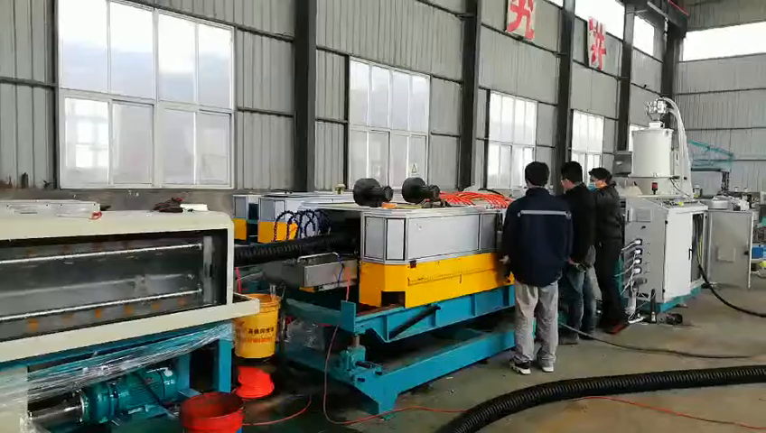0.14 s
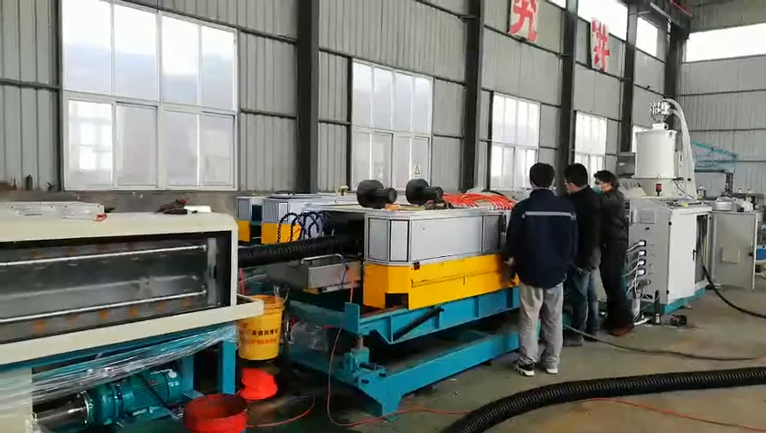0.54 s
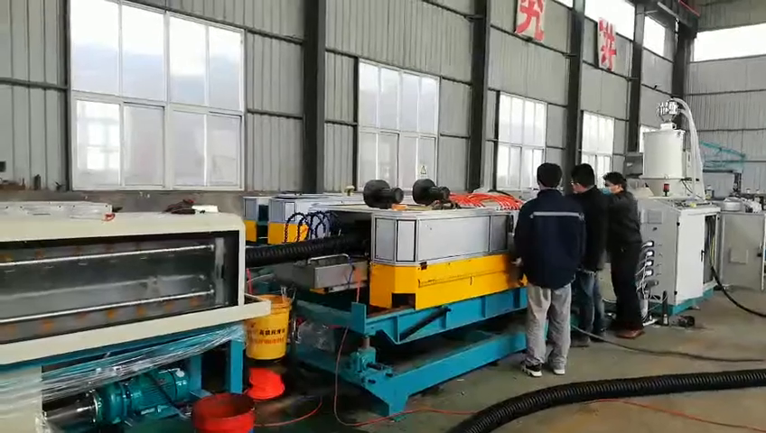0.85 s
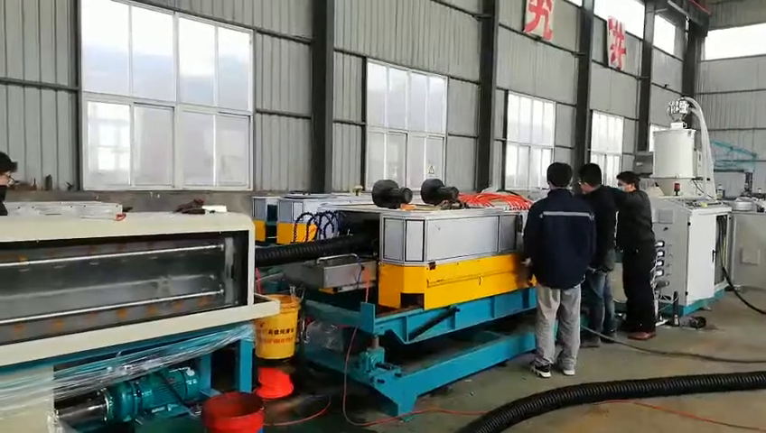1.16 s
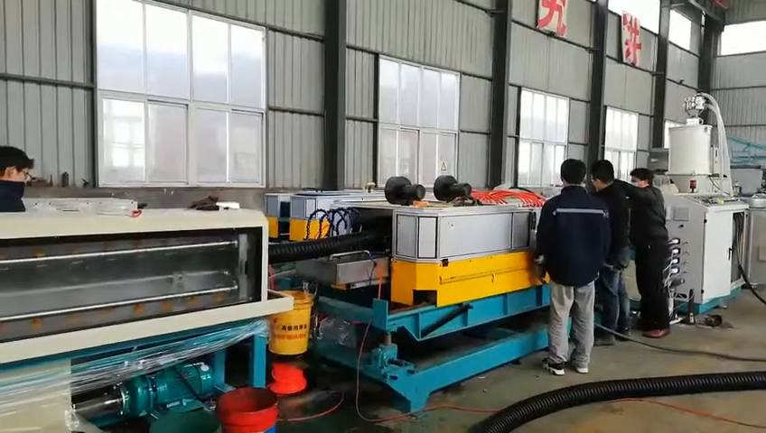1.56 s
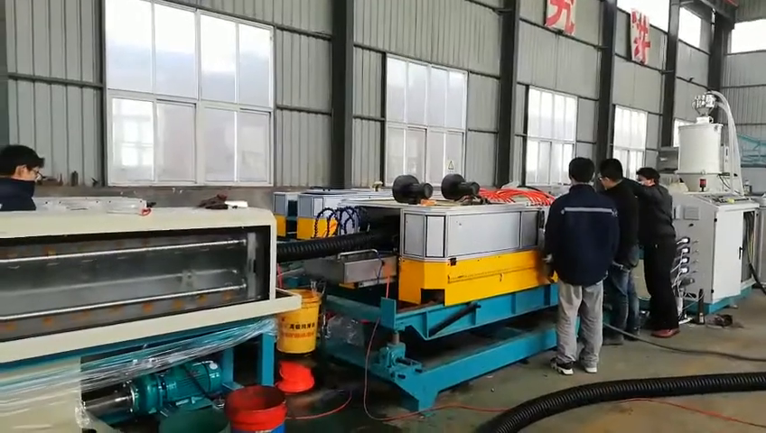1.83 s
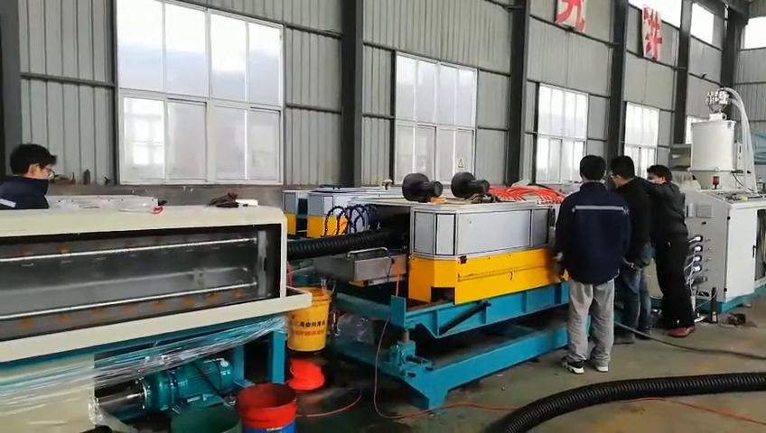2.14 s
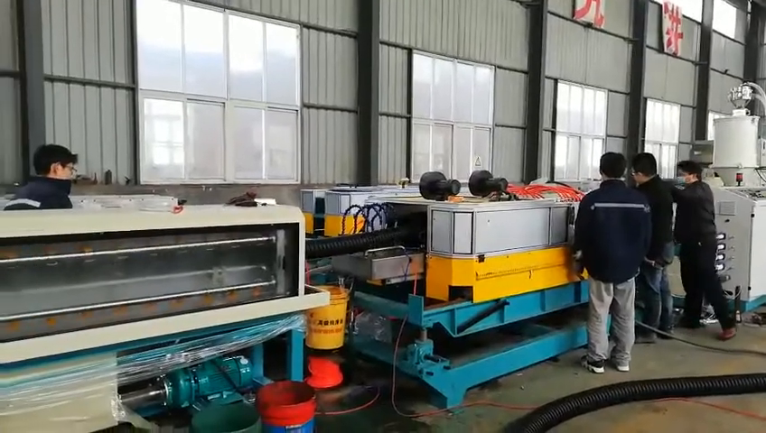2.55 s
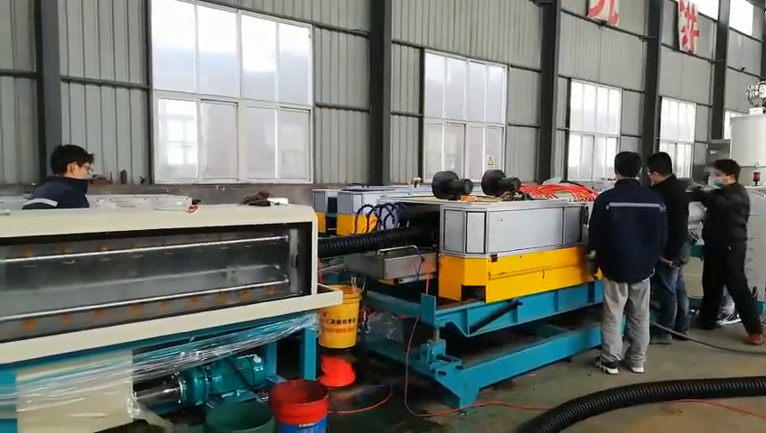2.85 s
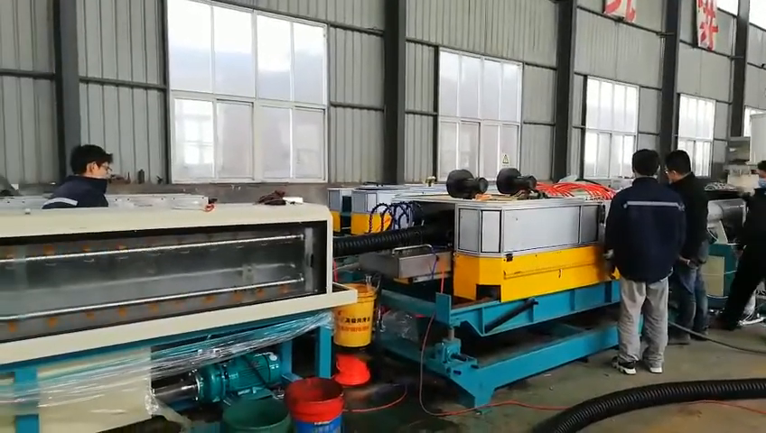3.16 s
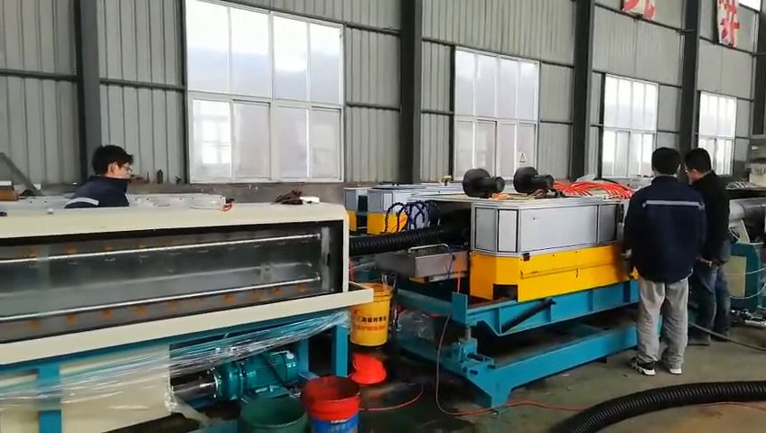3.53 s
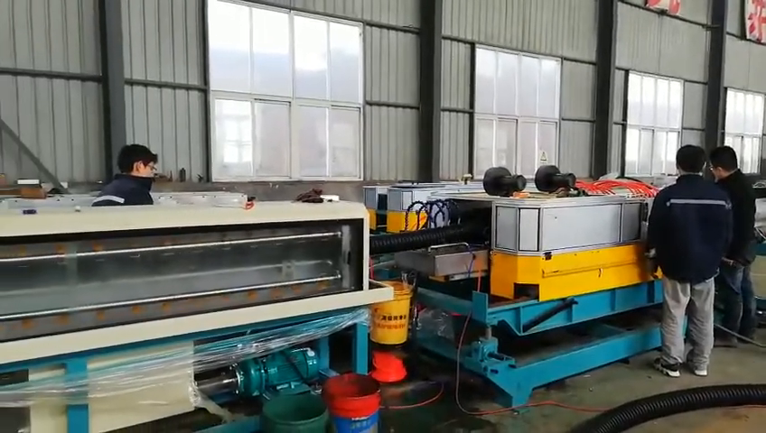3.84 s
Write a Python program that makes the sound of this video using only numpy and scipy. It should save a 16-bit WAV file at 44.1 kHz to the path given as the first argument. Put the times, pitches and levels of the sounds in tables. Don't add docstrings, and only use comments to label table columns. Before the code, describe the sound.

Steady industrial machine hum with a throbbing pump, electric motor whine and rushing air in a hall

```python
import sys
import numpy as np
from scipy import signal
from scipy.fft import rfft, irfft
from scipy.io import wavfile

SR = 44100
rng = np.random.default_rng(int(sys.argv[2]) if len(sys.argv) > 2 else 0)


def generate_wav(signal):
    frames = np.transpose(np.atleast_2d(signal))
    scaled = np.clip(frames, -1, 1) * 32767
    pcm = np.round(scaled).astype(np.int16)
    wavfile.write(sys.argv[1], SR, pcm)


def voltage_ratio(decibels):
    exponent = np.asarray(decibels, float) / 20
    return 10 ** exponent


N = 176400
SLOW_STEP = 60

START_S, OPEN_S = .2985, 0.0012
GAIN = [(.3, 0), (.45, 3), (.56, 1), (.75, -0.5), (2.0, 0), (4.0, 0)]
# left, right [Hz]
TOP_HZ = [
    [15800],
    [15100],
]

# (time [s], level [dB], phase drift [rad], slip of the strokes [rad])
PUMP = [(.3, -42, -4.5, -0.14), (.7, -33.5, -4, -0.18), (.95, -36.5, -2.5, -0.0061),
        (1.45, -35, -1.8, 0.067), (1.8, -37.5, -1.5, -.05), (2.2, -32.5, -1.5, -0.29),
        (2.7, -32.5, -1.6, 0.00074), (3.0, -33.5, -0.6, -0.042), (3.3, -35, -0.5, -0.55),
        (3.7, -37, -2.5, -0.75), (4.0, -38.5, -1.5, -0.51)]
PUMP_HZ, STROKES_PER_S, STROKE_S = 115.75, 9.09, 1.973
# order [strokes], level [dB], level change [dB/s]
STROKE_ORDERS = [-1, 1, 2]
STROKE_DB = [-40.5, -43.5, -49]
STROKE_FADE = [-0.4, -1, -0.9]
TWIST_RAD, CARRIER_LEAD_RAD = 2.8, 0.65
SWAY_HZ, SWAY_DB, SWAYS_PER_S, SWAY_S, SWAY_DEPTH = 45.63, -46.5, 1.98, 1.95, .75

# (pitch [Hz], level [dB], wander [dB])
HUMS = [(59.5, -64, 4.5), (99.5, -44.5, 1.5), (131.4, -46.5, -0.5), (144.5, -48, 3), (153.9, -48, 0),
        (223.6, -46, 2.5)]
# (pitch [Hz], left level [dB], right level [dB], wander [dB])
GEARS = [(604.9, -42, -45, 1.5), (725.7, -55, -53, 3), (737.8, -47, -54, 3), (796.2, -45.5, -58, 3),
         (839, -42, -56, 3), (907.5, -42.5, -47, 2.5), (924.4, -48, -49, 2.5), (939.7, -47, -58, 3),
         (988.7, -47, -56, 3), (1210.1, -48, -64, 2.1), (1512.5, -52, -65, 3), (1652.3, -56, -58, 2.1),
         (2047.2, -49, -63, 3), (2383, -50, -64, 3), (2570.4, -47, -55, 2.5), (2828.1, -49, -64, 2.5),
         (3024.7, -54, -63, 3), (8912.9, -60, -78, 3), (9091.7, -57, -76, 3)]
WANDER_PER_S, FLUTTER_PER_S, FLUTTER = 0.87, 18, 0.18

SWITCH_HZ, MOTOR_HZ = 1999.9, 32.09
MOTOR_WHINE = [(-9, -48, -73, -0.1, -4.7), (-7, -58, -64, -1.9, -0.1), (-5, -59, -66, -1.8, -2.4),
               (-3, -36, -51, 0.2, 2.3), (-1, -42, -52, -2.3, -3.3), (1, -47, -61, 0.1, -4.2),
               (3, -38, -54, -2.2, -0.3), (5, -42, -53, -1.2, 1.0), (7, -51, -62, 1.5, -1.1),
               (9, -49, -63, -1.5, 1.7), (11, -39.5, -53, 0.3, -2.3), (13, -47, -67, -1.8, 4.7),
               (17, -42, -66, -2.2, 3.5), (19, -55, -62, 5.0, -1.2), (23, -50, -68, -0.4, -6.2),
               (27, -66, -61, -0.9, 4.5)]
DOUBLE_WHINE = [(-6, -51, -65, -2.1, -5.5), (-4, -61, -60, -3.6, 1.4), (-2, -60, -59, 0.2, -1.6),
                (0, -53, -58, -3.2, 3.5), (2, -61, -63, 7.0, -1.6), (4, -60, -64, -5.3, -0.6),
                (6, -59, -62, -2.0, -1.2), (8, -53, -62, -1.2, 2.3), (10, -62, -68, -2.5, 1.9)]
FAN_SWITCH_HZ, FAN_HZ = 6001.8, 59.5
FAN_WHINE = [(-3, -69, -69, -4.9, -1.6), (-1, -59, -55, -4.3, 1.3), (0, -61, -61, -5.9, -0.5),
             (1, -56, -58, -2.2, 0.7), (3, -55, -66, 0.6, -0.4)]
WHINE_WANDER_DB = 2.1
# (order [turns], extra level [dB])
SETTLING = [(3, 5), (17, -5), (11, -2), (1, 2.5), (-1, 2.5), (5, 1.5)]
SETTLE_S = .8

# (frequency [Hz], density [dB per Hz])
RUMBLE = [(25, -16), (50, -5.5), (85, -6), (115, 2.5), (165, -1), (220, -1.5), (370, -2.5), (480, -7),
          (1000, -73)]
# (frequency [Hz], density [dB per Hz])
ROAR = [(250, -15.5), (450, -8.5), (720, -6.5), (1150, -12), (1450, -15.5), (3300, -14), (7000, -17.5),
        (15000, -43.5)]
RUMBLE_DB, ROAR_DB, BRIGHTEN_DB_PER_S = -36.5, -37.5, -0.34
# (frequency [Hz], level [dB])
LEFT = [(450, -0.5), (800, 8), (1200, 4.5), (2500, 11.5), (4000, 2), (6800, 0.5), (8500, 11), (15000, 19)]
# (centre [Hz], width [Hz], left level [dB], right level [dB])
CASINGS = [(584, 28, 5, -7), (744, 63, 0.5, -5.5), (880, 105, -1, -3), (2540, 140, 2.5, -3),
           (4460, 680, 2.5, 1), (6000, 220, 3.5, 2.5), (9350, 1080, 3, -7)]
# (frequency [Hz], likeness [0 to 1])
LIKENESS = [(30, .9998), (160, 0.95), (300, 0.88), (450, 0.42), (740, 0.38), (2000, 0.4), (5000, 0.1),
            (15000, 0.05)]
# (frequency [Hz], lead [rad])
LEAD = [(200, .1), (340, .25), (520, 2.9), (720, 3.0), (900, .9), (1450, -.5), (1800, 1.4), (2500, 2.8),
        (3400, 5.7), (5000, 9.4)]

# (start [s], rise [s], hold [s], fall by 60 dB [s], level [dB])
PUFFS = [
    (3.355, .03, .14, .6, -37),
    (1.54, .01, .02, .2, -44),
    (.29, .05, .15, .5, -45),
]
# (frequency [Hz], density [dB per Hz])
PUFF = [(300, -18), (800, -7), (1500, -8), (3000, -3), (4300, 0), (6800, -8), (9000, -24), (15000, -42)]
# (start [s], rise [s], hold [s], fall by 60 dB [s], level [dB])
LEAKS = [
    (3.33, .05, 0.26, 1, -60.5),
    (3.66, 0.14, 0.096, 0.67, -56),
]
# (frequency [Hz], density [dB per Hz])
LEAK = [(5000, -42), (8000, 4), (10000, -2), (13000, -13), (15500, -22)]

# (time [s], peak level [dB])
KNOCKS = [
    (.4350, -23),
    (1.705, -27),
]
# (pitch [Hz], level [dB], fall by 60 dB [s])
KNOCK = [(3000, 2.5, .008), (6100, -9, .03), (7600, -12, .01), (9500, -8, 0.015)]

# (time [s], length [s], level [dB])
SQUEAKS = [
    (2.315, .03, -47),
    (2.394, 0.034, -38),
    (2.467, 0.036, -46),
    (2.64, .02, -51),
    (2.925, .025, -49),
]
SQUEAK_HZ, SQUEAK_LEFT_DB, SQUEAK_RIGHT_DB = 4920, 3, -11


def times():
    return np.arange(N) / SR


def slow_times():
    return np.arange(N // SLOW_STEP) * SLOW_STEP / SR


def curve(rows):
    return np.interp(times(), *np.transpose(rows))


def at_hz(points, hz):
    point_hz, value = np.array(points)[:, 0], np.array(points)[:, 1]
    return np.interp(np.log(hz + 1), np.log(point_hz), value)


def drift(rate, count):
    r = np.exp(-2 * np.pi * rate * SLOW_STEP / SR)
    settle = 1500
    chance = rng.standard_normal((count, N // SLOW_STEP + settle))
    slow = signal.lfilter([1], [1, -2 * r, r * r], chance)[:, settle:]
    return (slow - slow.mean(1, keepdims=True)) / slow.std(1, keepdims=True)


def fine(slow):
    return np.interp(times(), slow_times(), slow)


def pump():
    t = times()
    s, level_db, phase, slip = np.transpose(PUMP)
    stroke = 2 * np.pi * STROKES_PER_S * (t - STROKE_S) + np.interp(t, s, slip)
    throb = voltage_ratio(np.interp(t, s, level_db)) * np.exp(1j * CARRIER_LEAD_RAD)
    for order, db, fade in zip(STROKE_ORDERS, STROKE_DB, STROKE_FADE):
        level = voltage_ratio(db + fade * (t - 4.0) + fine(2.4 * drift(2.5, count=1)[0]))
        throb = throb + level * np.exp(1j * (order * stroke + TWIST_RAD * (abs(order) - 1)))
    hum = throb * np.exp(1j * (2 * np.pi * PUMP_HZ * t + np.interp(t, s, phase)))
    beat = 1 + SWAY_DEPTH * np.exp(2j * np.pi * SWAYS_PER_S * (t - SWAY_S))
    sway = voltage_ratio(SWAY_DB + fine(2.8 * drift(1.5, count=1)[0])) * beat
    return np.sqrt(2) * np.real(hum + sway * np.exp(2j * np.pi * SWAY_HZ * t))


def tones(rows, alike=False):
    spectrum = np.zeros((2, N // 2 + 1), complex)
    blend = np.clip(1 - slow_times() / .2, 0, 1)
    near = np.arange(-120, 121)
    for hz, left_db, right_db, wander_db in rows:
        slow, fast = drift(WANDER_PER_S, count=4), drift(FLUTTER_PER_S, count=4)
        slow = wander_db * (slow + FLUTTER * fast)
        lead = np.array([[at_hz(LEAD, hz) * (not alike)], [0]])
        phase = 0.24 * slow[2:] + rng.uniform(0, 2 * np.pi) + lead
        shape = voltage_ratio(slow[:2]) * np.exp(1j * phase)
        shape = shape[[0, 0 if alike else 1]]
        shape = shape * voltage_ratio(np.array([left_db + 0 * blend, right_db + 0 * blend]))
        shape = shape + blend * (shape[:, -1:] - shape)
        spectrum[:, round(hz * N / SR) + near] += np.fft.fft(shape)[:, near] * SLOW_STEP / np.sqrt(2)
    return irfft(spectrum, N)


def hums():
    return tones([(hz, db, db, wander_db) for hz, db, wander_db in HUMS], alike=True)


def gears():
    return tones(GEARS)


def whine():
    t = slow_times() - 2.2
    settling = np.exp(-np.maximum(slow_times() - START_S, 0) / SETTLE_S)
    early = {round(order): db * settling for order, db in SETTLING}
    families = [(SWITCH_HZ, MOTOR_HZ, MOTOR_WHINE, early), (2 * SWITCH_HZ, MOTOR_HZ, DOUBLE_WHINE, {}),
                (FAN_SWITCH_HZ, FAN_HZ, FAN_WHINE, {})]
    rows = []
    for centre_hz, speed_hz, family, extra in families:
        for order, left_db, right_db, left_change, right_change in family:
            order = round(order)
            left = left_db + left_change * t + extra.get(order, 0)
            right = right_db + right_change * t
            rows.append((centre_hz + order * speed_hz, left, right, WHINE_WANDER_DB))
    return tones(rows)


def noise(spectrum, patchy_db, swell_db, count):
    hz = np.fft.rfftfreq(N, 1 / SR)
    mid, side = rfft(rng.standard_normal((2, N)))
    alike = np.clip(at_hz(LIKENESS, hz), -1, 1)
    colour = np.array([at_hz(LEFT, hz), 0 * hz]) + at_hz(spectrum, hz)
    for centre_hz, width_hz, left_db, right_db in CASINGS:
        bump = np.exp(-((hz - centre_hz) / width_hz) ** 2)
        colour = colour + np.outer([left_db, right_db], bump)
    pair = np.sqrt(1 + alike) * mid + np.sqrt(1 - alike) * side * [[1], [-1]]
    pair = pair * voltage_ratio(colour) * (hz > 15)
    pair[0] *= np.exp(1j * at_hz(LEAD, hz))
    pair = pair / np.sqrt(np.mean(irfft(pair[1], N) ** 2))
    place = np.clip(2 * np.log2(hz / 40 + 1e-9), 0, count - 1)
    swell = drift(0.81, count=count) + drift(3.7, count=1)
    gains = patchy_db * drift(8.4, count=count) + swell_db * swell
    gains[-3:] += BRIGHTEN_DB_PER_S * (slow_times() - 2)
    out = np.zeros((2, N))
    for band, gain_db in enumerate(gains):
        share = np.clip(1 - abs(place - band), 0, 1)
        out += voltage_ratio(fine(gain_db)) * irfft(pair * share, N)
    return out


def rumble():
    return voltage_ratio(RUMBLE_DB) * noise(RUMBLE, patchy_db=1.5, swell_db=0.3, count=9)


def roar():
    return voltage_ratio(ROAR_DB) * noise(ROAR, patchy_db=0.85, swell_db=0.12, count=18)


def puffs(rows, spectrum):
    t = times()
    shape = np.zeros(N)
    for start, rise, hold, t60, db in rows:
        fall = 60 * np.maximum(t - start - rise - hold, 0) / t60
        shape += voltage_ratio(db - fall) * np.clip((t - start) / rise, 0, 1)
    return shape * noise(spectrum, patchy_db=.6, swell_db=.15, count=18)


def knocks():
    out, t = np.zeros((2, N)), times()
    band = signal.butter(2, [2300, 10500], "band", fs=SR, output="sos")
    for start, db in KNOCKS:
        age = np.maximum(t - start, 0)
        ring = np.zeros(N)
        for hz, level_db, t60 in KNOCK:
            ring += voltage_ratio(level_db - 60 * age / t60) * np.sin(2 * np.pi * hz * age)
        hiss = signal.sosfilt(band, rng.standard_normal((2, N)))
        crack = voltage_ratio(-2 - 60 * age / 0.035) * (age > 0) * hiss
        out += voltage_ratio(db) * (ring + 0.83 * crack) * voltage_ratio(np.array([[0], [-9]]))
    return out


def squeaks():
    t = times()
    shape = np.zeros(N)
    for start, length, db in SQUEAKS:
        edge_s = np.minimum(t - start, start + length - t)
        shape += voltage_ratio(db - 6 * (t - start) / length) * np.clip(edge_s / 0.0027, 0, 1)
    waver = 1.1 * fine(drift(20, count=1)[0])
    whistle = np.sqrt(2) * shape * np.sin(2 * np.pi * SQUEAK_HZ * t + waver)
    return whistle * voltage_ratio(np.array([[SQUEAK_LEFT_DB], [SQUEAK_RIGHT_DB]]))


def scene():
    machines = pump() + hums() + gears() + whine() + rumble() + roar()
    air = puffs(PUFFS, PUFF) + puffs(LEAKS, LEAK)
    return machines + air + knocks() + squeaks()


def top_cut(x):
    return signal.sosfilt(signal.butter(12, 15830, fs=SR, output="sos"), x)


def record(dry):
    opened = np.clip((times() - START_S) / OPEN_S, 0, 1)
    heard = rfft(opened * dry * voltage_ratio(curve(GAIN)))
    passed = np.fft.rfftfreq(N, 1 / SR) < np.array(TOP_HZ)
    wet = irfft(heard * passed, N)
    started = times() > START_S - .002
    offset = -.00043 * opened
    return top_cut(started * wet + offset)


dry = scene()
out = record(dry)
generate_wav(out)
```